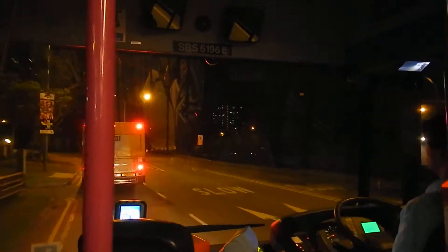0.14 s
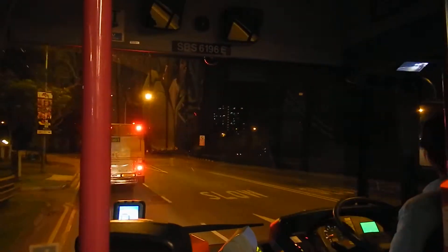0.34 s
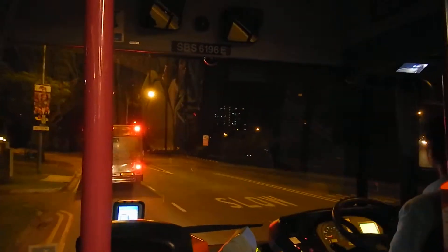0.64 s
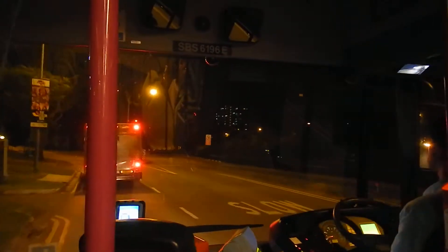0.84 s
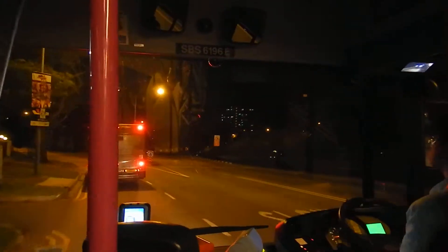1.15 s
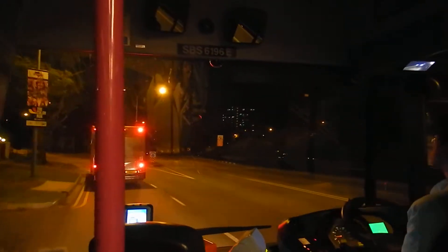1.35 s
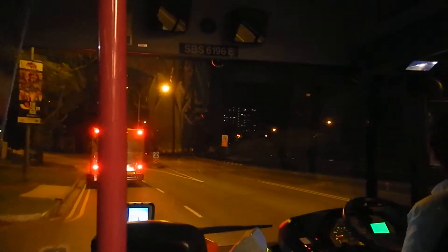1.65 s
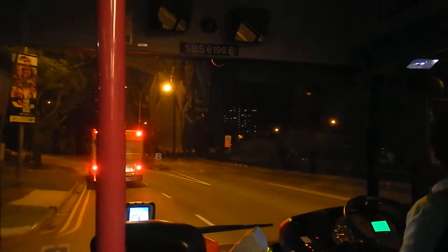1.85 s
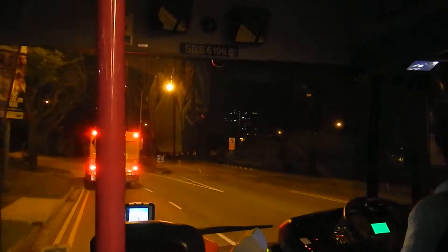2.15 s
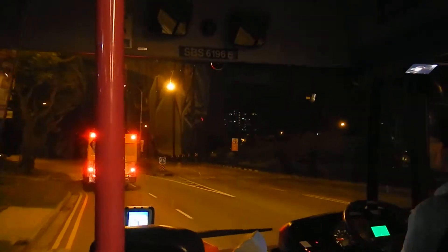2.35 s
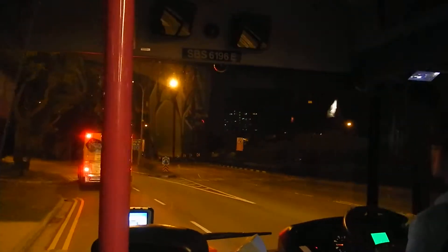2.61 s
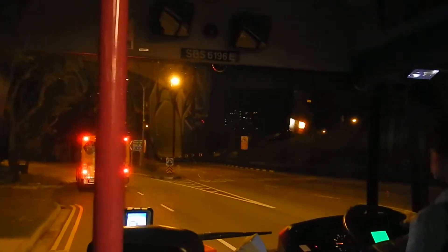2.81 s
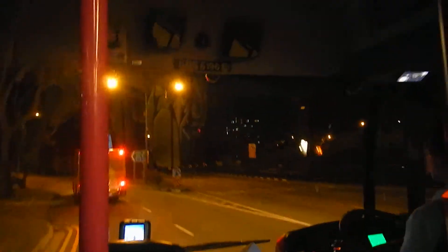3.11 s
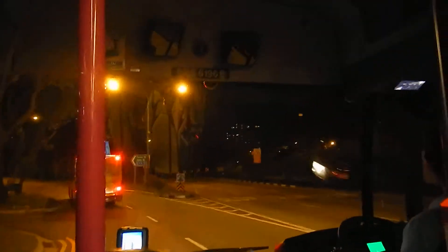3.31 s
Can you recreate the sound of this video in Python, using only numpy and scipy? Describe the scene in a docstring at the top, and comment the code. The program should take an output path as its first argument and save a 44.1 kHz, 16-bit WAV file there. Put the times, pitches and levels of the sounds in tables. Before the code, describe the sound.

A moving bus rumbles and drones from inside, its loose panels rattling over bumps.

```python
"""Inside a moving city bus

Near the driver, the engine drones at low orders of its crankshaft and slowly gains speed. The road excites
a boom in the body and a roar in the tyres, over a steady ventilation hiss with a faint fan whine. Bumps
thud through the low modes of the body and set off bursts of small impacts: loose panels rattle, and metal
fittings jingle and click in the reverberant cabin."""
import sys
import numpy as np
from scipy import signal
from scipy.fft import rfft, irfft, next_fast_len
from scipy.io import wavfile
from scipy.ndimage import map_coordinates

SR = 44100
rng = np.random.default_rng(int(sys.argv[2]) if len(sys.argv) > 2 else 0)


def bounce(signal):
    """Save signal as a 16-bit WAV file at the path given by the first command-line argument."""
    frames = np.transpose(np.atleast_2d(signal))
    limited = np.clip(frames, -1, 1)
    pcm = np.round(limited * 32767).astype(np.int16)
    wavfile.write(sys.argv[1], SR, pcm)


N = 153027
METAL_TAPS_PER_S = 320

# Coherence of the sound of the bus's structure, and of its small metal parts.
# Each row: frequency in Hz, correlation of left and right.
BODY_COHERENCE = [(30, 0.96), (100, 1), (450, 0.99), (850, 0.98), (1600, 0.95), (3000, 0.72), (6000, .45)]
METAL_COHERENCE = [(6000, 0.11)]


def amp(db):
    """Decibels as an amplitude ratio."""
    return 10 ** (np.asarray(db) / 20)


def unit(x):
    """Normalisation to rms 1."""
    return x / np.sqrt(np.mean(x ** 2) + 1e-20)


def along(points, hz):
    """Interpolation of (Hz, value) points on a logarithmic frequency axis."""
    f, values = np.transpose(points)
    return np.interp(np.log(hz + 1), np.log(f + 1), values)


def curves(rows):
    """Linear interpolation in time: one curve for each column after the first."""
    times, *columns = np.transpose(rows)
    return [np.interp(np.arange(N) / SR, times, column) for column in columns]


def wobble(rate):
    """Slow random modulation: a spline through rate Gaussian knots a second."""
    return map_coordinates(rng.standard_normal(1024), [np.arange(N) * rate / SR], mode="wrap")


def filtered(x, response):
    """Linear filtering: the spectrum of x times a frequency response."""
    size = next_fast_len(N + SR // 2)
    return irfft(rfft(x, size) * response(np.fft.rfftfreq(size, 1 / SR)), size)[..., :N]


def resonances(f, modes):
    """Modal superposition: the summed response of damped (Hz, width in Hz, dB) resonators."""
    return sum(amp(db) * 1j * f * w / (c * c - f * f + 1j * f * w) for c, w, db in modes)


def coloured(pair, spectrum, coherence):
    """Mid-side mixing: two independent signals become partly coherent, spectrally shaped stereo of rms 1."""
    def response(hz):
        angle = np.arccos(np.clip(along(coherence, hz), -1, .999)) / 2
        return amp(along(spectrum, hz)) * [np.cos(angle), np.sin(angle)]
    mid, side = filtered(pair, response)
    return unit(np.array([mid + side, mid - side]))


def rush(spectrum, coherence):
    """Filtered Gaussian noise, in stereo, of rms 1."""
    return coloured(rng.standard_normal((2, N)), spectrum, coherence)


def tone(hz):
    """A sinusoid of rms 1 whose phase is the integral of its frequency."""
    return np.sqrt(2) * np.sin(2 * np.pi * (np.cumsum(hz) / SR + rng.random()))


def shake(start, rise_s, hold_s, fall_db_per_s):
    """Envelope of a damped vibration: a linear rise, and exponential decay from hold_s after the start."""
    t = np.arange(N) / SR - start
    return np.clip(t / rise_s, 0, 1) * amp(-fall_db_per_s * np.maximum(t - hold_s, 0))


def taps(rate, ring_s, scatter_db):
    """Shot noise: irregular contacts, each an exponentially decaying crack; two channels of rms 1."""
    offsets, sizes = rng.random(8192), rng.standard_normal(8192)
    at = ((np.arange(len(offsets)) + offsets) * SR / rate).astype(int)
    blows = np.bincount(at[at < N], amp(scatter_db * sizes[at < N]) ** 2, N)
    power = signal.lfilter([1], [1, -np.exp(-2 / (ring_s * SR))], blows)
    return unit(np.sqrt(power) * rng.standard_normal((2, N)))


def cabin(x, wet_db, t60_s=0.41):
    """Reverberation: the cabin adds a diffuse, exponentially decaying tail to the direct sound."""
    t = np.arange(SR // 2) / SR
    tail = rng.standard_normal((2, len(t))) * np.exp(-np.log(1000) * t / t60_s)
    tail /= np.linalg.norm(tail, axis=1, keepdims=True)
    return x + amp(wet_db) * signal.fftconvolve(x, tail, axes=1)[:, :N]


def ventilation():
    """Broadband and tonal fan noise: moving air hisses over a narrow-band hum and a thin whine."""
    # Air hiss. Each row: frequency in Hz, relative spectral density in dB.
    spectrum = [(30, -20.5), (300, -1), (750, 8.5), (1000, 4.5), (1800, 3.5), (2700, -3), (4200, 0),
                (5000, -2.5), (6050, 0), (6700, -18.5), (7800, -20.5), (9000, -26.5), (12000, -31.5),
                (15800, -36.5)]
    # Each row: frequency in Hz, correlation of left and right.
    coherence = [(1000, 0.89), (2000, 0.74), (3000, 0.64), (5800, 0.28), (10000, 0.19)]
    hum_hz, width_hz, whine_hz = 411.7, 20, 1125
    hum = filtered(rng.standard_normal(N), lambda f: resonances(f, [(hum_hz, width_hz, 0)]) ** 2)
    whine = amp(-44 + 3.4 * wobble(5.2)) * tone(whine_hz * (1 + 0.002 * wobble(24)))
    hiss = amp(-35.5 + 0.53 * wobble(12)) * rush(spectrum, coherence)
    return hiss + amp(-34.5) * unit(hum) + whine


def clinks():
    """Impact noise: a small loose part bounces in quick succession, making a crisp, very bright click."""
    # Each row: start in seconds, level in dB.
    clicks = [(.752, -56), (.938, -50.5), (1.208, -53), (1.29, -57), (1.45, -56), (1.662, -52.5),
              (2.255, -54), (2.315, -56), (2.574, -50.5), (2.682, -53)]
    # Each row: frequency in Hz, relative spectral density in dB.
    spectrum = [(2500, -23), (8000, 5), (12500, -3.5), (15800, -9)]
    power = sum((amp(db) * shake(s, rise_s=0.0097, hold_s=0.022, fall_db_per_s=482)) ** 2
                for s, db in clicks)
    contacts = np.sqrt(power) * taps(METAL_TAPS_PER_S, ring_s=.0022, scatter_db=4.5)
    contacts = cabin(contacts, wet_db=-2.5)
    return contacts.std() * coloured(contacts, spectrum, METAL_COHERENCE)


def fittings():
    """Impacts excite lightly damped modes: metal parts chatter faintly all the time and jingle on bumps."""
    # Each row: start in seconds, time until the decay in seconds, level in dB.
    jingles = [(0.706, 0.04, -42.5), (0.764, 0.069, -44), (0.92, 0.04, -44), (1.287, 0.03, -40),
               (1.432, 0.14, -41.5), (1.646, 0.033, -41.5), (2.171, 0.17, -36.5), (2.538, 0.058, -33),
               (2.676, 0.035, -38.5), (2.788, 0.03, -45), (2.93, 0.058, -44.5)]
    # Ringing of the metal. Each row: frequency in Hz, bandwidth in Hz, gain in dB.
    modes = [(5780, 81, -1), (6900, 35, 13), (7450, 45, 6), (7800, 180, 9.5), (8480, 100, 2)]
    # Spectral envelope. Each row: frequency in Hz, relative gain in dB.
    spectrum = [(300, -46), (1500, 4), (4500, 5.5), (6000, 5.5), (6700, -11), (8300, -14), (9500, -22.5),
                (13000, -27), (15800, -35)]
    jingle_power = sum((amp(db) * shake(s, rise_s=0.007, hold_s=hold, fall_db_per_s=302)) ** 2
                       for s, hold, db in jingles)
    chatter = amp(-59.5 + 7 * wobble(12))
    force = np.sqrt(jingle_power + chatter ** 2)
    contacts = cabin(force * taps(METAL_TAPS_PER_S, ring_s=0.0036, scatter_db=2.0), wet_db=2.5)
    ringing = filtered(contacts, lambda f: 1 + resonances(f, modes))
    pan = amp([[0.5], [-0.5]])
    return contacts.std() * coloured(ringing, spectrum, METAL_COHERENCE) * pan


def panels():
    """Repeated contact drives panel resonances: each bump gives a bright rattle, a knock and a buzz."""
    # Each row: start in seconds, level in dB, knock and buzz in dB relative to that level.
    rattles = [(0.264, -31, -3, -7), (0.438, -30.5, -4, -8.5), (.78, -34, 7, -5), (0.863, -27.5, -7, -16),
               (0.939, -25, -2.5, -12), (1.292, -25.5, -3, -7), (1.453, -31, 0, -9),
               (1.523, -26.5, 1.5, -6), (1.588, -28.5, -4.5, -9.5), (1.627, -25, -0.5, -6),
               (1.664, -26, -3.5, -5.5), (1.79, -34, 3, -6), (1.855, -34.5, -5, -9), (1.997, -34, 6, -3.5),
               (2.253, -23.5, 0, -8), (2.318, -25, -0.5, -7), (2.476, -27, 0.5, -6.5), (2.578, -20, 0, -5),
               (2.682, -20.5, -3.5, -5.5), (2.78, -23.5, 0, -5), (2.878, -33.5, 6, -8)]
    # Hollow resonances of the panels. Each row: frequency in Hz, bandwidth in Hz, gain in dB.
    modes = [(370, 380, -4.5), (530, 55, -4), (793, 64, 0.5), (1427, 160, -0.5), (1612, 130, 7.5),
             (2075, 72, -1), (2370, 130, -3.5)]
    # Spectral envelopes. Each row: frequency in Hz, relative gain in dB.
    rattle_spectrum = [(300, 0.5), (1000, 3), (2000, 1), (2800, 1), (4000, 0.5), (4900, -2), (5800, -1.5),
                       (6300, -5), (6650, -23), (7900, -19), (9000, -31), (15800, -44)]
    knock_spectrum = [(150, -22), (350, 3), (2200, -11), (3500, -14.5), (11000, -63.5)]
    # Each row: frequency in Hz, correlation of left and right.
    coherence = [(400, 0.92), (1500, 0.93), (3000, 0.74), (5800, 0.32), (9000, 0.087)]
    buzz_hz, width_hz = 5450, 650
    power = np.array([(amp(db) * shake(s, rise_s=0.01, hold_s=0.016, fall_db_per_s=451)) ** 2
                      for s, db, *_ in rattles])

    def bursts(gains):
        force = np.sqrt(gains ** 2 @ power)  # incoherent sources add in power
        return cabin(force * taps(rate=1300, ring_s=.0012, scatter_db=0), wet_db=-3)

    _, _, knock_db, buzz_db = np.transpose(rattles)
    rattle, knock, buzz = bursts(np.ones(len(rattles))), bursts(amp(knock_db)), bursts(amp(buzz_db))
    buzz_ring = filtered(buzz, lambda f: resonances(f, [(buzz_hz, width_hz, 0)]))
    knock_ring = filtered(knock, lambda f: resonances(f, modes))
    bright = rattle.std() * coloured(rattle, rattle_spectrum, coherence)
    thin = buzz.std() * coloured(buzz_ring, rattle_spectrum, coherence)
    hollow = knock.std() * coloured(knock_ring, knock_spectrum, BODY_COHERENCE)
    pan = amp([[-0.7], [0.7]])
    return (bright + thin) * pan + hollow


def thuds():
    """Damped free vibration: a wheel meets a bump, and the soft blow rings the low modes of the body."""
    # Each row: start in seconds, level in dB.
    bumps = [(1.53, -14), (1.93, -19.5), (2.25, -19.5), (2.83, -19.5), (2.98, -16)]
    # Each row: natural frequency in Hz, relative level in dB.
    modes = [(59, -8), (134, -3), (360, -10)]
    sound = np.zeros(N)
    for start, level_db in bumps:
        ring = sum(amp(db) * tone(np.full(N, hz)) for hz, db in modes)
        sound += amp(level_db) * shake(start, rise_s=0.013, hold_s=0.013, fall_db_per_s=174) * ring
    return sound


def road():
    """Random excitation by the road: the body booms and the tyres roar, swelling on rough stretches."""
    # Each row: time in seconds, boom level in dB, tyre level in dB.
    levels = [(.08, -24, -25.5), (.32, -21.5, -25), (.8, -23, -24.5), (1.05, -22.5, -25),
              (1.33, -22.5, -24), (1.48, -16, -21.5), (1.7, -23.5, -23.5), (1.98, -16, -22),
              (2.15, -20, -23), (2.38, -20.5, -23.5), (2.65, -20, -24), (2.98, -18.5, -22.5),
              (3.17, -21.5, -24.5), (3.45, -22, -21.5)]
    # Each row: frequency in Hz, relative spectral density in dB.
    boom_spectrum = [(14, -32), (27, -13), (41, -22), (50, -13), (60, -4.5), (72, -6.5), (92, -3.5),
                     (125, -1), (155, -9), (180, -14), (235, -14.5), (285, -29), (700, -100)]
    tyre_spectrum = [(30, -51), (130, 5), (220, -12), (283, -8), (340, 0.5), (410, 1.5), (480, -2.5),
                     (570, -2.5), (660, -3.5), (780, -2), (950, -7.5), (1650, -10), (2300, -17.5),
                     (3200, -25), (9000, -74)]
    boom_db, tyres_db = curves(levels)
    boom = amp(boom_db) * rush(boom_spectrum, BODY_COHERENCE)
    roar = amp(tyres_db + wobble(11.42)) * rush(tyre_spectrum, BODY_COHERENCE)
    return boom + roar


def engine():
    """Harmonics of the crankshaft throb together, and each firing modulates the amplitude of a growl."""
    # Each row: time in seconds, rotation rate of the crankshaft in Hz.
    speeds = [(0, 33.57), (.55, 32.79), (.8, 33.72), (1.2, 34.71), (1.7, 36.51), (2.2, 38.88), (2.55, 40.5),
              (2.85, 41.37), (3.1, 40.35), (3.45, 38.63)]
    # Each row: time in seconds, levels of the 2nd, 3rd and 4th orders in dB.
    order_levels = [(0, -30.5, -28, -40), (.27, -23, -22, -26.5), (.7, -45, -19, -31.5),
                    (.92, -46, -31, -30), (1.25, -31, -39, -34), (1.75, -27, -37, -31.5),
                    (2.2, -35, -26, -25.5), (2.5, -24.5, -24.5, -50), (2.85, -20.5, -25.5, -31),
                    (3.2, -27.5, -23.5, -35), (3.45, -21, -30, -36)]
    # Each row: frequency in Hz, relative spectral density in dB.
    growl_spectrum = [(40, -47), (110, -25), (150, -4), (190, 1.5), (208, -11.5), (240, 0.5), (282, -18.5),
                      (340, -4.5), (450, -12.5), (700, -14), (1200, -35), (4000, -100)]
    crank_hz = curves(speeds)[0] * (1 + 0.0094 * wobble(11))
    throb_db = 1.2 * wobble(17)
    drone = sum(amp(db + throb_db + 0.5 * wobble(18)) * tone(order * crank_hz)
                for order, db in enumerate(curves(order_levels), 2))
    firing = 1 + 0.5 * tone(3 * crank_hz)  # three firings a revolution
    growl_db = -30.5 + 0.56 * (crank_hz - 40)  # louder with speed
    growl = amp(growl_db) * unit(firing * rush(growl_spectrum, BODY_COHERENCE))
    return drone + growl


def scene():
    """Superposition of all sources, the lows a little to the left and the high treble to the right."""
    # Each row: frequency in Hz, level of left minus right in dB.
    balance = [(500, 0.58), (1200, 1), (2300, -0.1), (4000, 1), (6000, 0), (7800, -3), (11500, -0.5)]
    sound = engine() + road() + thuds() + ventilation() + panels() + fittings() + clinks()
    return filtered(sound, lambda f: amp(along(balance, f) * np.array([[.5], [-.5]])))


def record(dry):
    """Band-stop and low-pass filtering: the recorder cuts three narrow notches and limits the band."""
    # Each row: centre frequency in Hz, width in Hz.
    notches = [(2500, 136), (3200, 325), (5000, 280)]
    top_hz = 15800

    def response(f):
        stops = [(c * c - f * f) / (c * c - f * f + 1j * f * w) for c, w in notches]
        return np.prod(stops, axis=0) * (f < top_hz)
    return filtered(dry, response)


dry = scene()
out = record(dry)
bounce(out)
```